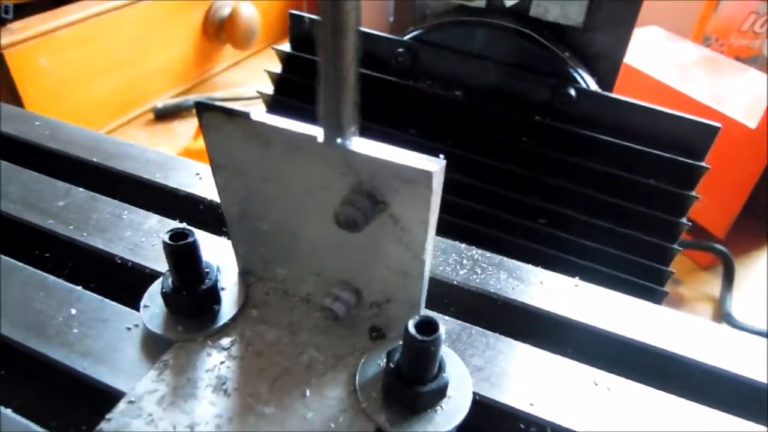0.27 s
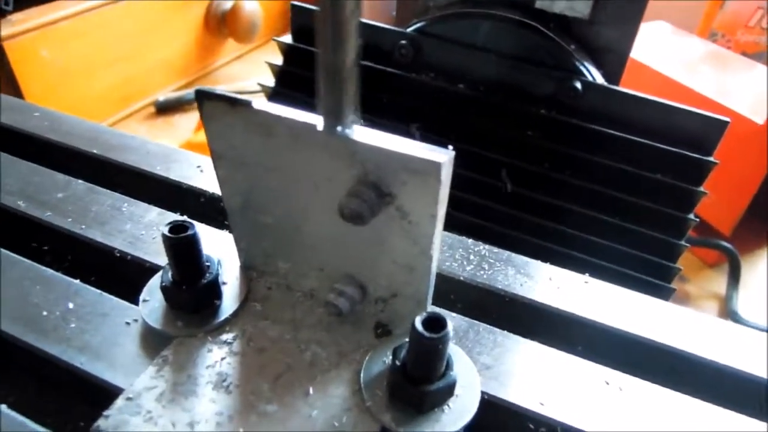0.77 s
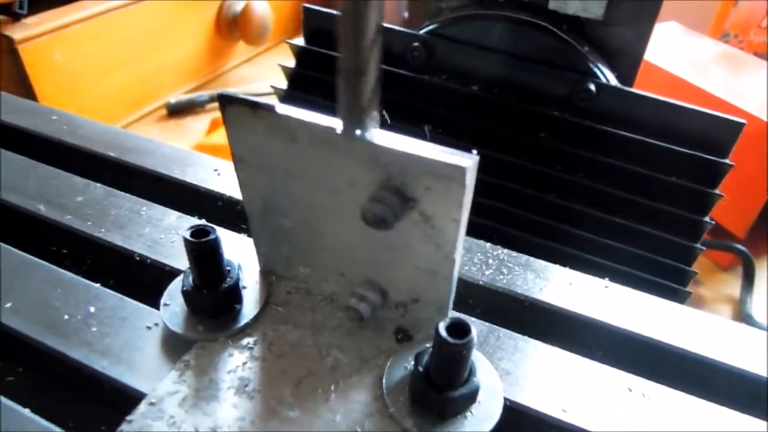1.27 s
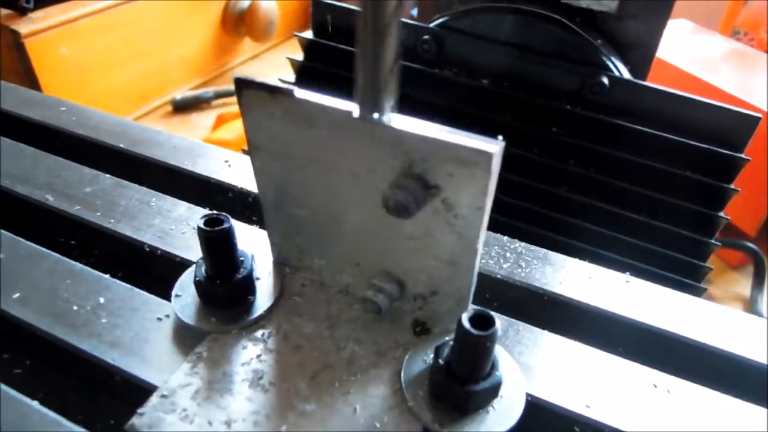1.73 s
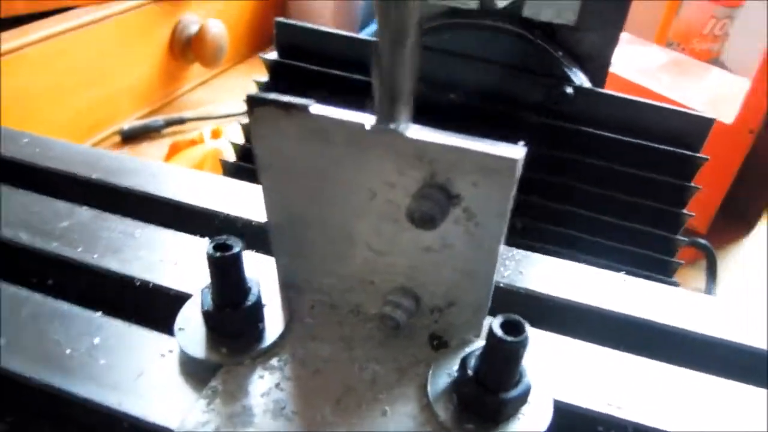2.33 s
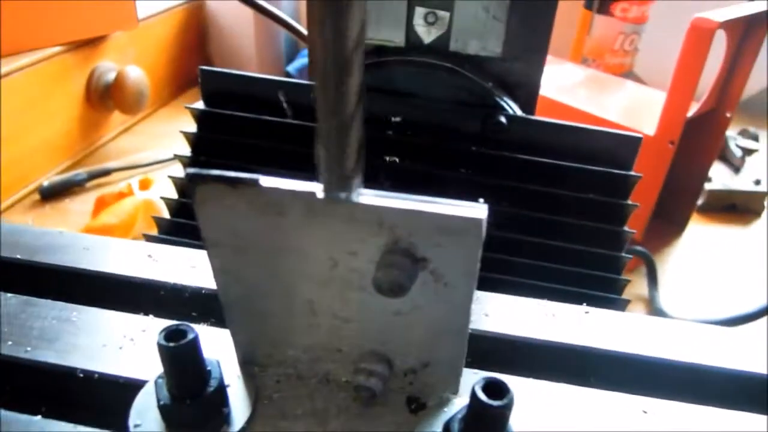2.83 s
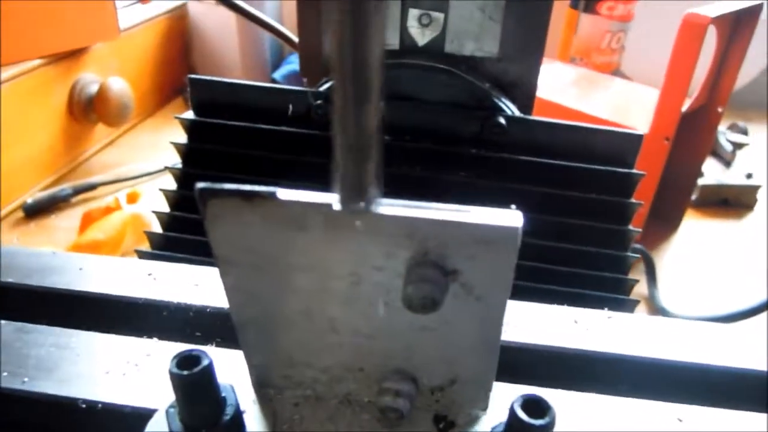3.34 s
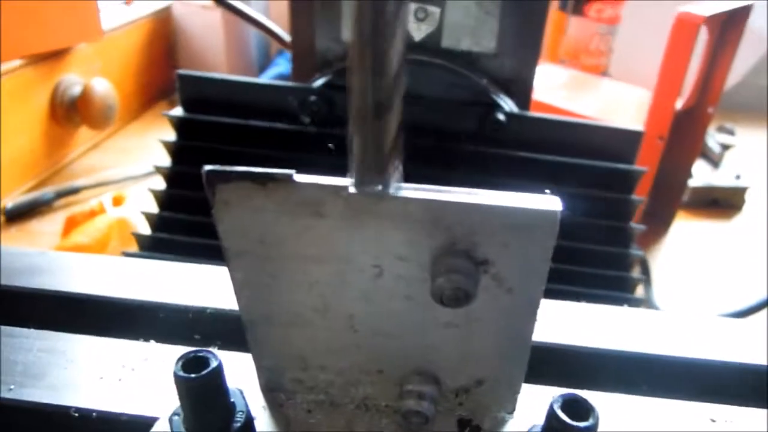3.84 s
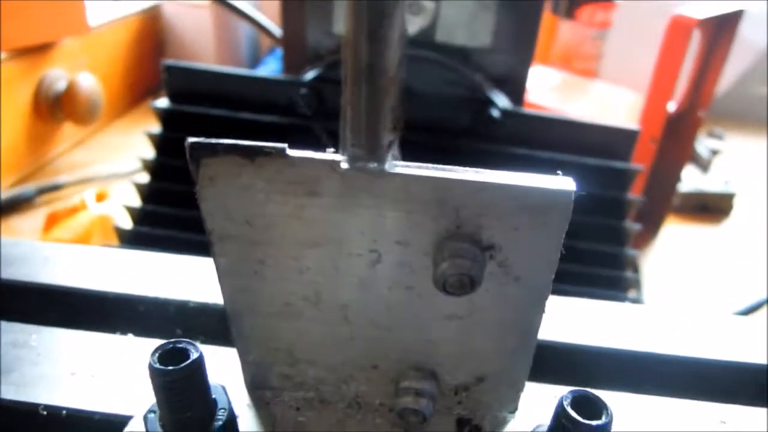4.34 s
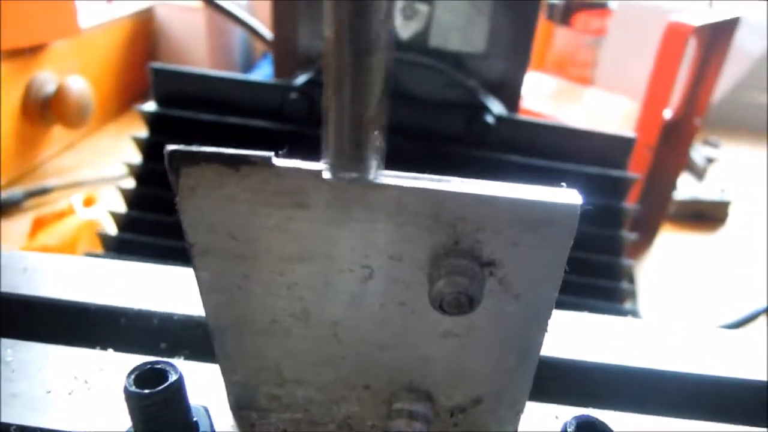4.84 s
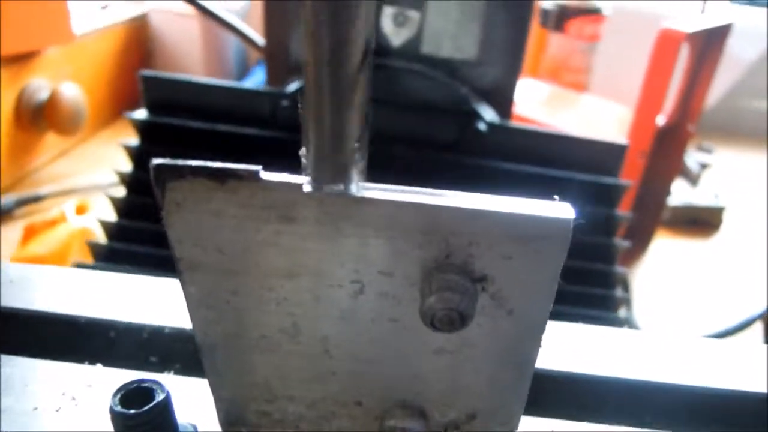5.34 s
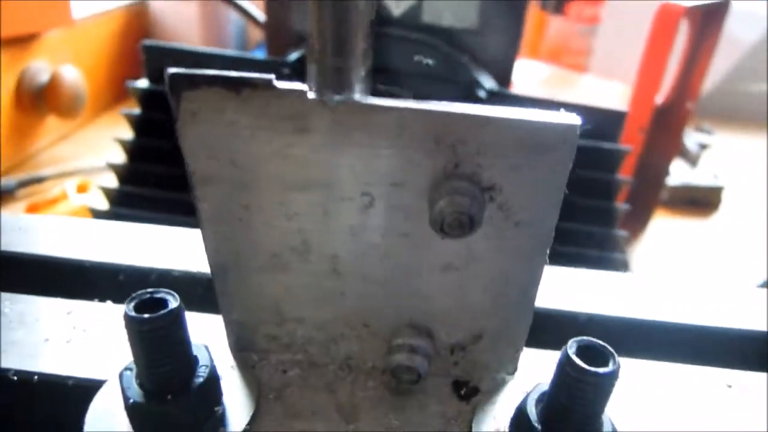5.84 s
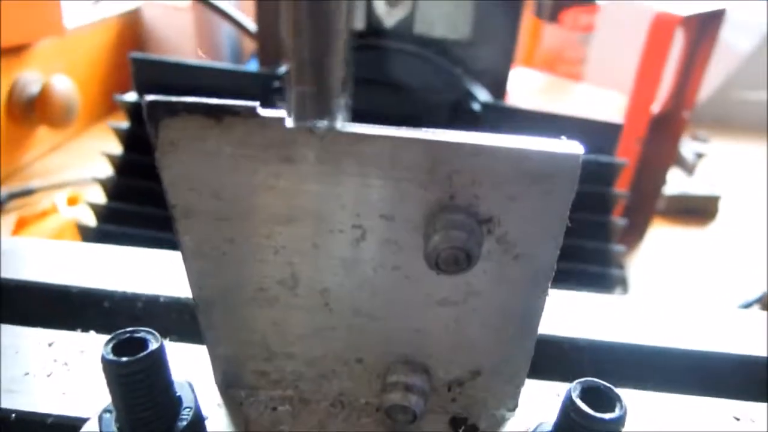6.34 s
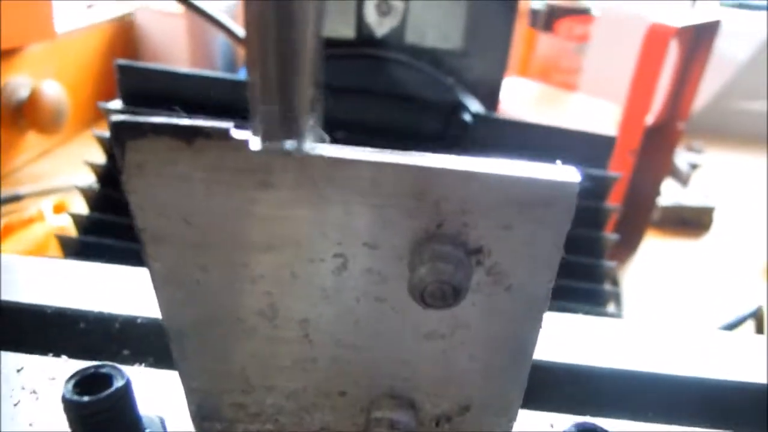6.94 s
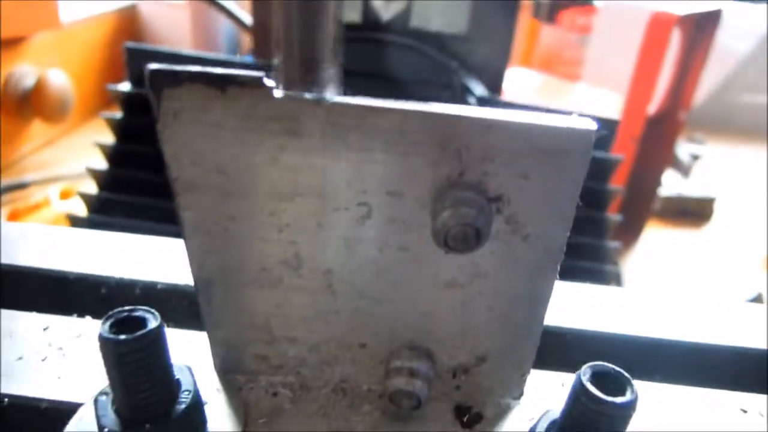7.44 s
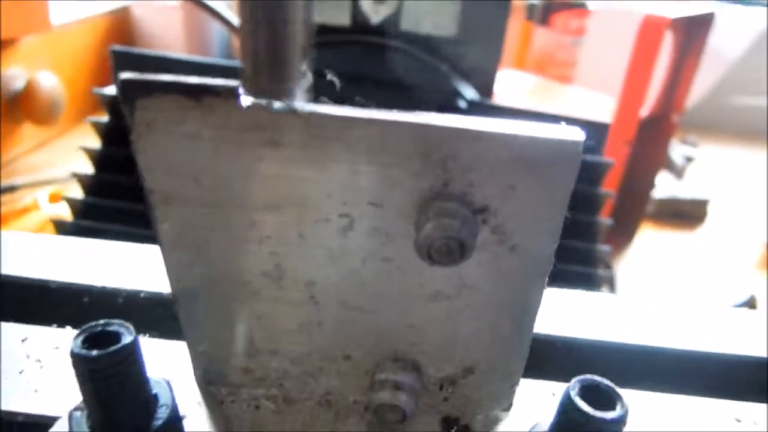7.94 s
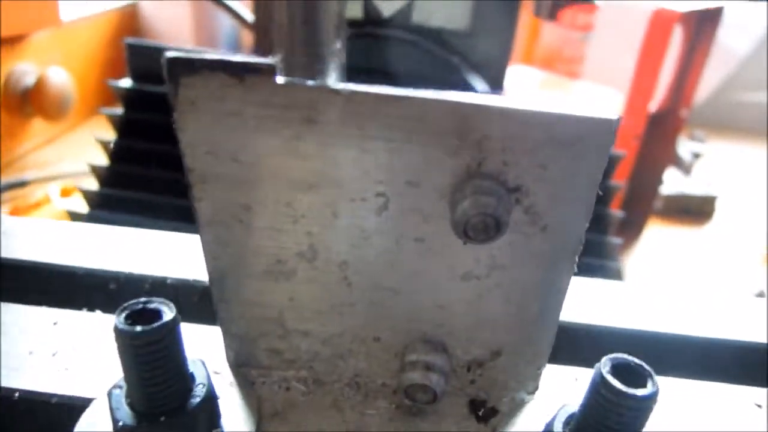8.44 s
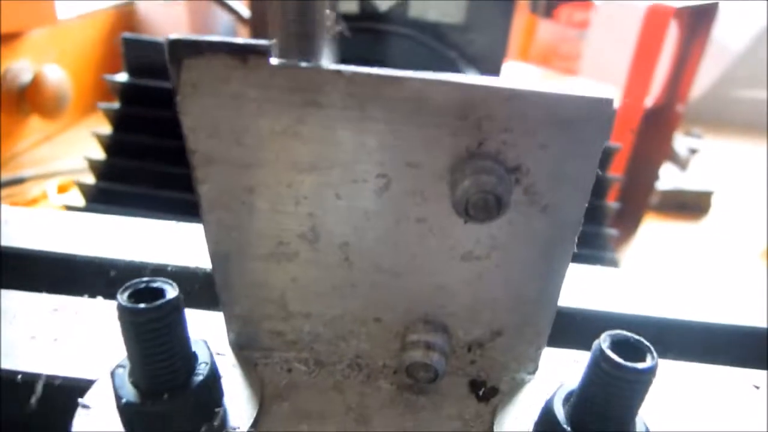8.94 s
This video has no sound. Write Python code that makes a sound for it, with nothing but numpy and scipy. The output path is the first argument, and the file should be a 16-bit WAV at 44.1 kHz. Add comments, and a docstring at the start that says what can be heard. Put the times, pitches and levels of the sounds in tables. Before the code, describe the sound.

A small milling machine is already cutting a metal plate at the start and runs loudly for about nine seconds. The cutter's very rapid bites merge into a steady, ringing, mid-pitched whine of several tones. Above it sit a buzzing, gritty gear rattle and shrill chatter; beneath it are a low hum, a rumble and the rush of the motor fan. Tiny chips tick constantly, with sharper snaps scattered throughout. The cut swells slightly around 1.7, 3.9 and 4.9 seconds. Between about 6.3 and 7 seconds it becomes rougher, with a fast, lopsided pulse that lasts to the end. It eases briefly from 7.1 to 7.5 seconds, then bites harder at 7.6. The microphone moves slowly closer and round to the side, so the rattle gradually changes colour. The space sounds dry, with almost no echo.

```python
"""A four-flute milling cutter works along the edge of a clamped metal plate and runs into a step at its end.
Each flute strikes the plate and the machine's frame, which ring in their natural modes. Gear teeth rattle
in the head, harder with each bite and each surge of rectified mains in the motor; the surges also make
the cutter chatter. Chips snap and fly off, the machine table hums and rumbles, and the motor's fan rushes.
A microphone moves slowly around the machine, so the colour of the rattle changes."""
import sys
import numpy as np
from scipy import signal
from scipy.fft import rfft, irfft, next_fast_len
from scipy.io import wavfile
from scipy.ndimage import uniform_filter1d, map_coordinates

SR = 44100
rng = np.random.default_rng(int(sys.argv[2]) if len(sys.argv) > 2 else 0)


def inscribe(sig):
    """Save sig as 16-bit PCM at rate SR to the path in sys.argv[1].

    A 1-D sig is mono; a 2-D sig holds one channel per row.
    Samples are clipped to [-1, 1] before scaling.
    """
    pcm = np.round(np.clip(np.atleast_2d(sig).T, -1, 1) * 32767)
    wavfile.write(sys.argv[1], SR, pcm.astype(np.int16))


N = 405719

SPINDLE_HZ, RIPPLE_HZ, GEAR_TEETH = 18.291, 99.79, 31

# spectrum of the motor's fan: (frequency [Hz], relative density [dB])
FAN_SPECTRUM = [(10, -25), (40, -22), (150, -11), (280, -12), (420, 0), (1000, -1), (2000, 1.5),
                (4000, -2.5), (14000, -53)]
# stereo width of the fan: (frequency [Hz], side minus mid [dB])
FAN_WIDTH = [(40, 12), (150, -9), (500, -15), (900, -36), (1500, -66)]
# rumble of the machine table: (frequency [Hz], relative density [dB])
RUMBLE_SPECTRUM = [(40, -45), (130, -12), (210, -4.5), (310, 0.5), (420, -1), (600, -12), (1200, -50)]
# hum at mean load: (multiple of spindle speed [1], level on the edge [dB], level in the step [dB])
HUM_HARMONICS = [(4, -50, -51), (5, -60, -57), (6, -66, -60), (7, -51, -50), (8, -51.5, -53.5),
                 (9, -83, -68), (10, -81, -59), (11, -59, -70), (12, -48, -50), (13, -56, -57),
                 (14, -56.5, -59.5), (15, -71, -64), (16, -62.5, -75), (17, -55, -52), (18, -62.5, -51.5),
                 (19, -53, -73), (20, -46, -52.5)]
# the loudest chip fractures: (time [s], relative level [dB])
CHIP_SNAPS = [(0.224, -8), (0.4928, -12), (0.6882, -2), (0.757, -7), (0.775, -9), (0.9854, -7),
              (1.1273, -1), (1.145, -5), (1.727, -6), (1.7366, -6), (1.7574, -10), (1.853, -3), (1.867, -2),
              (2.6596, -1.5), (2.688, -1), (3.1502, -8), (3.7105, -5), (3.9425, -6), (4.372, -3),
              (4.4029, -6), (5.5129, -5), (5.5747, 0), (5.8466, -3.5), (5.882, -3), (6.99, -2),
              (7.0464, -7), (7.098, -2), (7.92, -2), (8.2477, -6), (8.5213, -4), (8.6303, -1.5),
              (8.851, -7), (8.962, -8), (9.001, -3), (9.014, -3), (9.1225, -1.5)]
# cutter modes: (frequency [Hz], bandwidth [Hz], gain afar [dB], gain close [dB], gain at the side [dB])
CHATTER_MODES = [(3102, 112, 2.5, 1, -4.5), (3240, 160, 1, -0.5, -3.5), (4580, 150, -13, -12, -6),
                 (4915, 240, -9, -5, -3), (5830, 360, 3, -1, -3.5), (6580, 240, 2, -6, -9),
                 (6780, 340, -10, -7, -12)]
# gear head modes: (frequency [Hz], width [Hz], gain afar [dB], gain close [dB], gain at the side [dB])
HEAD_MODES = [(1196, 79, -4, -1.5, -1), (1448, 38, -10, 0, 2), (1804, 130, -3.5, 0.5, -0.5),
              (2107, 126, -6, -5.5, -1), (2390, 77, -12.5, -3.5, 1), (2630, 95, 1, 0.5, 3.5),
              (3060, 95, 8.5, 2.5, 3.5), (3260, 150, 0, 5, 5.5), (3770, 220, 5.5, -11, -1.5),
              (4240, 180, 6.5, -5, 1.5), (4530, 120, 5.5, 3, 4.5), (4934, 170, 2, 7, 7.5),
              (5180, 160, 4, -6, 1.5), (5860, 390, 6.5, -0.5, 4), (6380, 280, 5.5, 1.5, 0.5),
              (6980, 570, 5, 0, 2), (7980, 260, -9, 1.5, 4.5), (8670, 360, 2.5, 1.5, 3.5),
              (9780, 320, -1, -5.5, 0.5), (10470, 510, -6.5, -1.0, 3.5), (11580, 410, -5, -9, 3),
              (12500, 180, -3, -1, -1), (13500, 340, -10, -8, -5)]
# uneven feed of the cutter: (time [s], level about the usual feed [dB])
FEED_LEVEL = [(0, -0.4), (0.68, -0.1), (1.05, -0.5), (1.52, -0.1), (1.68, 3), (1.94, -1.5), (2.35, -1.5),
              (2.58, 0.5), (2.76, -2), (3.3, 0.3), (3.5, -0.5), (3.86, 2.5), (4.05, 0), (4.55, -0.5),
              (4.85, 2.5), (5.8, 1), (6.65, 0.8), (6.98, -0.7), (7.12, -3.5), (7.47, -3.5), (7.63, 2),
              (8.02, -0.1), (8.48, 0.6), (9.2, -1)]
# how far the cutter has run into the step: (time [s], share [0-1])
STEP_SHARE = [(0, 0), (6.3, 0), (6.9, 1), (9.2, 1)]
# flutes on the straight edge and in the step: (entry [turns], push [dB], exit [turns], release [dB])
EDGE_FLUTES = [(0.0899, -1, 0.29, -9), (0.298, -1.7, 0.5309, -0.5), (0.5554, 2, 0.711, -6),
               (0.805, -3, 0.8966, -1.5)]
STEP_FLUTES = [(0.075, 7, 0.2457, 3), (0.414, -11, 0.5637, 5), (0.6451, -16, 0.7107, -2),
               (0.8182, 10, 0.8953, -3)]
# frame modes on the edge and in the step: (frequency [Hz], bandwidth [Hz], gain [dB])
EDGE_FRAME_MODES = [(434, 36, -15.5), (635, 266, -16)]
STEP_FRAME_MODES = [(476, 69, -15), (678, 107, -12.5)]
# the plate's main mode, shifting with the cutter's grip: (time [s], frequency [Hz])
PLATE_PITCH = [(0, 821), (6.3, 825), (7, 828), (7.55, 832), (7.95, 828), (8.25, 813), (9.2, 825)]
# the plate swells while a chip hangs on, sinks where a flute finds no metal: (start [s], end [s], gain [dB])
PLATE_SWELLS = [(1.6, 1.82, 1.5), (2.188, 2.64, 2.5), (3.342, 3.42, 3), (3.835, 3.93, 1.8),
                (4.163, 4.235, 4.5), (4.82, 5.1, 1.5), (6.457, 6.54, 4.5), (7.883, 7.955, -7)]
# radiation from plate and frame: (frequency [Hz], gain [dB])
RADIATION = [(100, -20), (250, -7.5), (420, 0), (890, 1), (1030, -5.5), (1500, -5), (3000, -15)]
# path of the microphone: (time [s], place [0 afar, 1 close, 2 at the side])
MIC_PLACE = [(0, 0.055), (1.8, 0.44), (2.8, 0.57), (3.7, 1.02), (5.6, 1.48), (6.8, 1.87), (9.2, 2.21)]
# stereo width of rattle and chips: (frequency [Hz], side gain [dB])
RATTLE_WIDTH = [(1200, -32), (2500, -76), (3200, -6.5), (3900, -30), (5400, -7.5), (7000, -16),
                (8000, -9.5), (10000, -8), (12000, -3.5), (14000, -2.5)]
# level difference between the microphone's ports: (frequency [Hz], left minus right [dB])
PORT_BALANCE = [(75, -1.4), (150, 0), (4400, 0), (5300, 1.2), (7000, .2), (8800, 2.6), (11000, 2.2),
                (13500, -.5)]
# phase difference between the ports: (frequency [Hz], lead of the left [rad])
PORT_PHASE = [(70, -.25), (300, 0), (8000, 0), (10000, .35), (12000, .95), (14000, .9)]


def amp(db):
    """Decibels to amplitude ratio."""
    return 10 ** (np.asarray(db) / 20)


def unit(x):
    """Normalisation to rms 1."""
    return x / np.sqrt(np.mean(x ** 2) + 1e-20)


def along(points, hz):
    """Interpolation of (frequency, value) points on a logarithmic axis."""
    f, v = np.transpose(points)
    return np.interp(np.log(hz + 1), np.log(f + 1), v)


def curve(points):
    """Linear interpolation of (time, value) points at every sample."""
    return np.interp(np.arange(N) / SR, *np.transpose(points))


def wobble(rate):
    """Smooth random modulation with rate knots a second."""
    return map_coordinates(rng.standard_normal(int(N * rate / SR) + 4), [np.arange(N) * rate / SR])


def filtered(x, response):
    """Linear filtering: the spectrum of x times a frequency response."""
    size = 2 * next_fast_len(N // 2 + SR // 8)
    return irfft(rfft(x, size) * response(np.fft.rfftfreq(size, 1 / SR)), size)[..., :N]


def shaped(x, gains):
    """Zero-phase filtering by (frequency, gain in dB) points."""
    return filtered(x, lambda hz: amp(along(gains, hz)))


def causal(gain):
    """Minimum phase: a response with this gain that rings only after a blow."""
    cepstrum = irfft(np.log(gain + 1e-6))
    half = len(cepstrum) // 2
    cepstrum[1:half] *= 2
    cepstrum[half + 1:] = 0
    return np.exp(rfft(cepstrum))


def blows(at, size):
    """An impulse train with the given sample positions and sizes."""
    inside = (at > 0) & (at < N - 1)
    return np.bincount(np.round(at[inside]).astype(int), size[inside], N)


def decay(x, life_s):
    """Exponential decay of every impulse, with time constant life_s."""
    return signal.lfilter([1], [1, -np.exp(-1 / (life_s * SR))], x)


def ring(x, hz, width_hz):
    """A damped oscillator of variable pitch: each impulse starts a fading sinusoid."""
    phasor = np.exp(2j * np.pi * np.cumsum(hz) / SR)
    return (phasor * decay(x / phasor, 1 / (np.pi * width_hz))).real


def resonances(modes, hz):
    """Modal superposition: second-order resonances summed with alternating sign."""
    return sum((-1) ** k * amp(db) * 1j * hz * width / (centre ** 2 - hz ** 2 + 1j * hz * width)
               for k, (centre, width, db) in enumerate(modes))


def each_turn(turns, share):
    """Periodic rotation: the sample positions at which the spindle passes this share of a turn."""
    return np.interp(np.arange(int(turns[-1]) + 1) + share, turns, np.arange(N))


def drive_levels():
    """Force follows feed and chip thickness; the knock also gains along the microphone's path. In dB."""
    feed_db, thickness = curve(FEED_LEVEL), wobble(12)
    knock_db = -29.5 + 1.08 * feed_db + 1.5 * curve(MIC_PLACE) + 0.33 * thickness
    rattle_db = -20.5 + feed_db - 0.02 * thickness
    return knock_db, rattle_db


def cutting_force_db(turns, bite_db=3, uneven_db=1.46, runout_db=1.1, step_db=2, lag_turns=0.13):
    """Periodic loading: four bites a turn, made unequal by runout; in the step one flute takes most."""
    angle = 2 * np.pi * (turns - lag_turns)
    bites_db = bite_db * np.cos(len(EDGE_FLUTES) * angle)
    unequal_db = uneven_db * np.cos(2 * angle) + runout_db * np.cos(angle + 1)
    lurch_db = step_db * curve(STEP_SHARE) * np.cos(2 * np.pi * (turns - .85))
    return bites_db + unequal_db + lurch_db


def fan(level_db=-33):
    """Steady broadband noise of the fan, whose rumble reaches the ports unequally. Returns mid and side."""
    mid, side = amp(level_db) * unit(shaped(rng.standard_normal((2, N)), FAN_SPECTRUM))
    return np.array([mid, shaped(side, FAN_WIDTH)])


def workshop(x, t60_s=0.043, wet_db=-11):
    """Diffuse reflection from table and walls adds a short reverberant tail."""
    t = np.arange(SR // 4) / SR
    tail = rng.standard_normal((2, len(t))) * amp(-60 * t / t60_s) * (t > .002)
    return x + amp(wet_db) * signal.fftconvolve(x, tail / np.linalg.norm(tail[0]), axes=1)[:, :N]


def table_rumble(knock_db, gain_db=-20, afar_db=-10):
    """Structure-borne noise: the scraping rumbles in the table, heard mainly from close."""
    distance_db = afar_db * np.clip(1 - curve(MIC_PLACE), 0, 1)
    rumble = unit(shaped(rng.standard_normal(N), RUMBLE_SPECTRUM))
    return amp(knock_db + gain_db + distance_db) * rumble


def table_hum(turns, knock_db, waver_db=1.5, follows=0.86, heaviest_turns=.69, lag_rad=0.1042):
    """Forced vibration: the periodic cut shakes the table at spindle harmonics, more under load."""
    step = curve(STEP_SHARE)
    slow_load_db = follows * uniform_filter1d(knock_db - knock_db.mean(), SR // 2)
    hum = 0
    for k, edge_db, step_db in HUM_HARMONICS:
        level_db = edge_db + step * (step_db - edge_db) + slow_load_db + waver_db * wobble(6)
        phase = 2 * np.pi * round(k) * (turns - heaviest_turns) - lag_rad * k * k
        hum += amp(level_db) * np.cos(phase)
    return np.sqrt(2) * hum


def swarf(turns, per_s=110, gain_db=8, scatter_db=3, pitch_hz=6400, spread=0.31, life_s=0.00087, modes=3):
    """Free vibration: tiny chips fly off, mostly during bites, and tick. Returns mid and side."""
    crowding = np.cumsum(amp(2 * cutting_force_db(turns)))
    draws = rng.random((int(per_s * N / SR), 2))
    at = np.interp(draws[:, 0], crowding / crowding[-1], np.arange(N)).astype(int)
    pan = 2 * (2 * draws[:, 1:] - 1)
    chance = np.clip(rng.standard_normal((len(at), modes + 1)), -2, 2)
    size = amp(gain_db + scatter_db * chance[:, :1])
    hz = pitch_hz * np.exp(spread * chance[:, 1:, None])
    t = np.arange(SR // 150) / SR
    ticks = size * np.cos(2 * np.pi * hz * t).mean(1) * np.exp(-t / life_s)
    where = (at[:, None] + np.arange(len(t))).ravel()
    return np.array([np.bincount(where, (ticks * share).ravel(), N)[:N] for share in (1, pan)])


def chip_snaps(turns, life_s=0.0016, gain_db=-9.5, small_db=-11, scatter_db=2, tick_db=-9):
    """Fracture: a breaking chip gives a noise burst and rings the steel. Returns mid and side."""
    snap_s, snap_db = np.transpose(CHIP_SNAPS)
    at = each_turn(turns, 0.885)  # in the step the heaviest flute snaps a small chip each turn
    size = amp(small_db + scatter_db * np.clip(rng.standard_normal(len(at)), -2, 2))
    small = curve(STEP_SHARE) * amp(curve(FEED_LEVEL)) * blows(at, size)
    breaks = amp(gain_db) * (blows(snap_s * SR, amp(snap_db)) + small)
    tick = amp(tick_db) * ring(breaks, hz=4750 + 350 * wobble(30), width_hz=300)
    crack = decay(breaks, life_s) * rng.standard_normal((2, N))
    return crack + tick * np.array([[1], [0]])


def chatter(turns, surge_phase=.33, scatter_s=.0006, scatter_db=1.5, follows=0.67, wander_hz=35):
    """Impulse excitation: each motor surge jerks the cutter through the metal and rings its modes."""
    place = curve(MIC_PLACE)
    force = unit(amp(follows * cutting_force_db(turns)))
    surges_s = (np.arange(int(N / SR * RIPPLE_HZ)) + surge_phase) / RIPPLE_HZ
    out = 0
    for hz, width_hz, *views_db in CHATTER_MODES:
        late, size = np.clip(rng.standard_normal((2, len(surges_s))), -2, 2)
        jerks = force * blows((surges_s + scatter_s * late) * SR, amp(scatter_db * size))
        gain = np.interp(place, np.arange(len(views_db)), amp(views_db))
        out += gain * ring(jerks, hz + wander_hz * wobble(70), width_hz)
    return out


def gears(turns, ripple_db=3.9, flutter_db=1.5, scatter_db=2.1, scatter_s=.00019, slide=0.28, tick=0.067):
    """Impact and friction of gear teeth, modulated by motor surges and the cut. Returns mid and side."""
    surge = np.cos(2 * np.pi * (RIPPLE_HZ * np.arange(N) / SR - 0.49))
    force = amp(ripple_db * surge + cutting_force_db(turns) + flutter_db * wobble(110))
    force = np.tanh(force / 2)  # a soft limit keeps the rattle even, so no single burst sticks out
    at = np.interp(np.arange(int(turns[-1] * GEAR_TEETH)) / GEAR_TEETH, turns, np.arange(N))
    late, size = rng.standard_normal((2, len(at)))
    hits = blows(at + late * scatter_s * SR, amp(scatter_db * np.clip(size, -2, 2)))
    grit = force * (unit(decay(hits, life_s=0.0008)) + slide) * rng.standard_normal((2, N))
    return unit(unit(grit) + tick * unit(force * hits) * np.array([[1], [0]]))


def recoloured(x, depth_db=2.5):
    """Random spectral modulation: no two bursts of the rattle excite the same modes."""
    spectra = signal.stft(x, nperseg=128)[2]
    colour = uniform_filter1d(rng.standard_normal(spectra.shape[1:]), size=5, axis=0)
    colour = uniform_filter1d(colour, size=6, axis=1)
    gain = amp(depth_db * np.clip(unit(colour), -2, 2))
    return unit(signal.istft(spectra * gain, nperseg=128)[1][:, :N])


def gear_head(x):
    """Directional radiation: the balance of the head's resonances changes with the microphone's place."""
    place = curve(MIC_PLACE)
    centre, width, *views_db = np.transpose(HEAD_MODES)
    grid = np.linspace(0, SR / 2, 2048)
    peaks = 1 / (1 + ((grid - centre[:, None]) / width[:, None]) ** 2) ** 2
    out = 0
    for k, db in enumerate(views_db):
        gain = unit(np.sqrt(amp(db) ** 2 @ peaks))
        nearness = np.clip(1 - abs(place - k), 0, 1)
        out += nearness * filtered(x, lambda hz: causal(np.interp(hz, grid, gain)))
    return out


def bites(turns, flutes, scatter_db=0.77, scatter_s=.00004):
    """Impulsive forces: each flute pushes as it enters the metal and releases as it leaves."""
    out = np.zeros(N)
    for enters, push_db, leaves, release_db in flutes:
        for share, force in ((enters, amp(push_db)), (leaves, -amp(release_db))):
            at = each_turn(turns, share)
            late, size = rng.standard_normal((2, len(at)))
            out += blows(at + late * scatter_s * SR, force * amp(scatter_db * size))
    return out


def scraped(bite, scrape_db, life_s=0.018):
    """Friction noise: each bite is followed by the scrape through its chip."""
    scrape = decay(abs(bite), life_s) * rng.standard_normal(N)
    return unit(bite) + amp(scrape_db) * unit(scrape)


def plate_and_frame(on_plate, on_frame, frame_modes, plate_width_hz, rise_s=0.035):
    """Resonance of the struck plate and frame; the plate's ring swells or sinks with the cutter's hold."""
    t = np.arange(N) / SR
    swell_db = sum(db * np.interp(t, [start, start + rise_s], [0, 1]) * (t < end)
                   for start, end, db in PLATE_SWELLS)
    plate = ring(on_plate * amp(swell_db), curve(PLATE_PITCH), plate_width_hz)
    frame = filtered(on_frame, lambda hz: resonances(frame_modes, hz))
    return unit(2 * np.pi * plate_width_hz / SR * plate + frame)


def cutter(turns, knock_db, gain_db=-0.7, step_db=-0.5):
    """Periodic impact: four flutes knock frame and plate; in the step the plate gets one lurch a turn."""
    step = curve(STEP_SHARE)
    even = bites(turns, EDGE_FLUTES)
    drive = scraped(even, scrape_db=-13.5)
    on_edge = plate_and_frame(drive, drive, EDGE_FRAME_MODES, plate_width_hz=21)
    lurch = scraped(bites(turns, STEP_FLUTES, scatter_db=0.8), scrape_db=-17)
    rough = scraped(even, scrape_db=-1.5)
    in_step = plate_and_frame(lurch, rough, STEP_FRAME_MODES, plate_width_hz=44)
    cut = np.sqrt(1 - step) * on_edge + amp(step_db) * np.sqrt(step) * in_step
    radiated = filtered(cut, lambda hz: causal(amp(along(RADIATION, hz))))
    return amp(knock_db + gain_db) * unit(radiated)


def scene():
    """Superposition at two microphone ports: the cut's tones are centred, rattle and chips are wide."""
    turns = SPINDLE_HZ * np.arange(N) / SR
    knock_db, rattle_db = drive_levels()
    rattle = gear_head(amp(rattle_db - 1.82) * recoloured(gears(turns)) + chip_snaps(turns))
    centred = cutter(turns, knock_db) + amp(rattle_db - 0.15) * chatter(turns)
    centred += table_hum(turns, knock_db) + table_rumble(knock_db)
    rush = fan()
    mid, side = workshop(rattle + amp(rattle_db) * swarf(turns))
    mid, side = np.array([mid + centred, shaped(side, RATTLE_WIDTH)]) + rush
    stereo = np.array([mid + side, mid - side])
    half = np.array([[.5], [-.5]])  # each port takes half of the level and phase difference
    return filtered(stereo, lambda hz: amp(half * along(PORT_BALANCE, hz))
                    * np.exp(1j * half * along(PORT_PHASE, hz)))


def record(dry):
    """Soft saturation rounds the highest peaks, and a steep low-pass limits the band."""
    ceiling, top_hz = .85, 14250
    rounded = dry / (1 + abs(dry / ceiling) ** 6) ** (1 / 6)
    return filtered(rounded, lambda hz: 1 / np.sqrt(1 + (hz / top_hz) ** 240))


dry = scene()
out = record(dry)
inscribe(out)
```